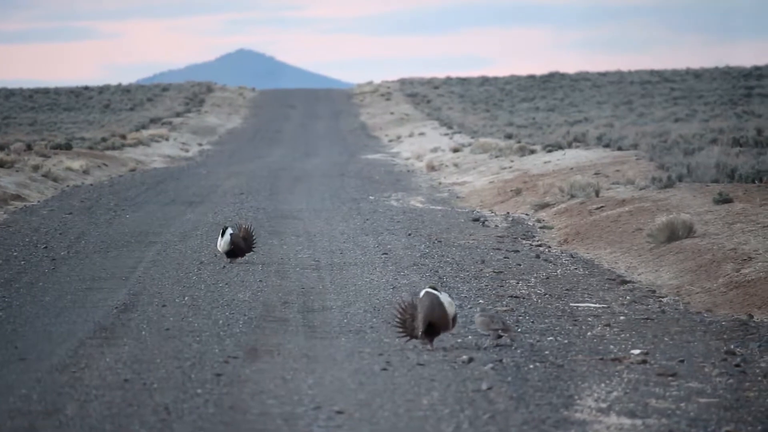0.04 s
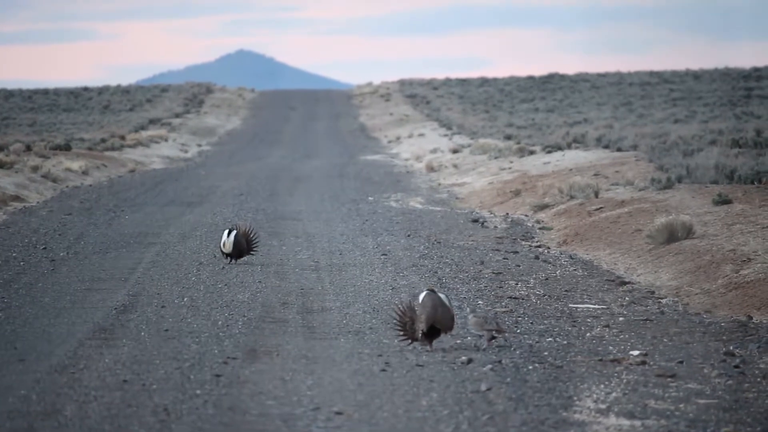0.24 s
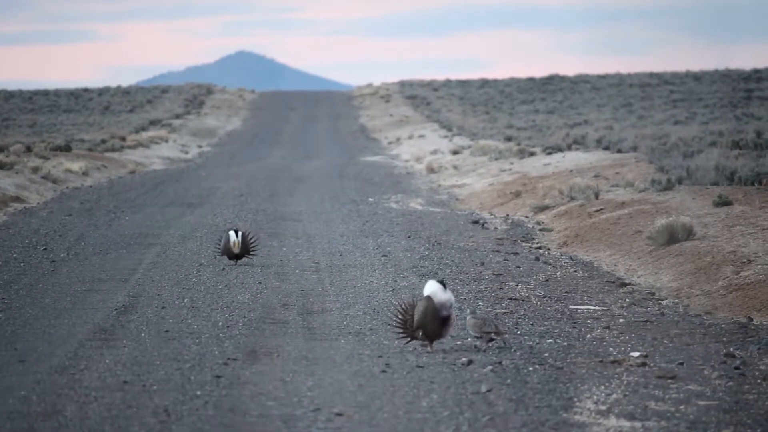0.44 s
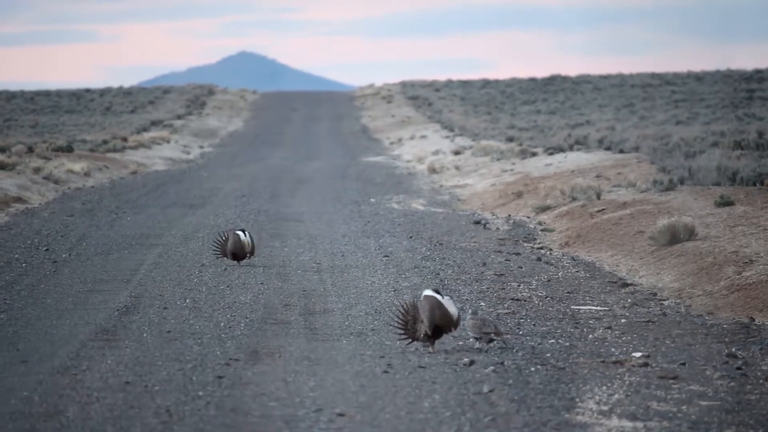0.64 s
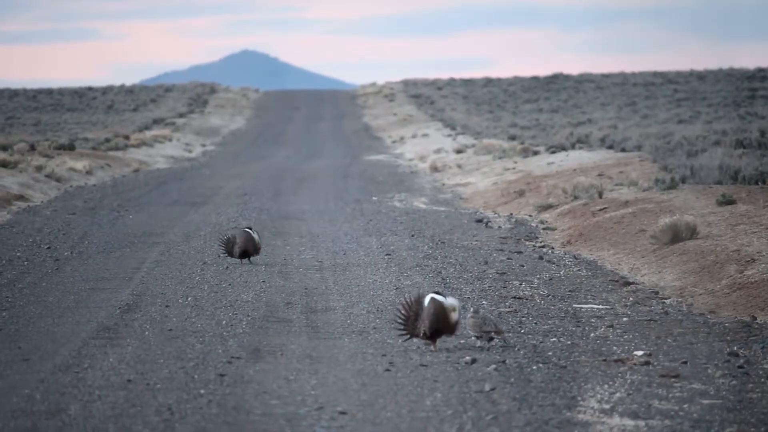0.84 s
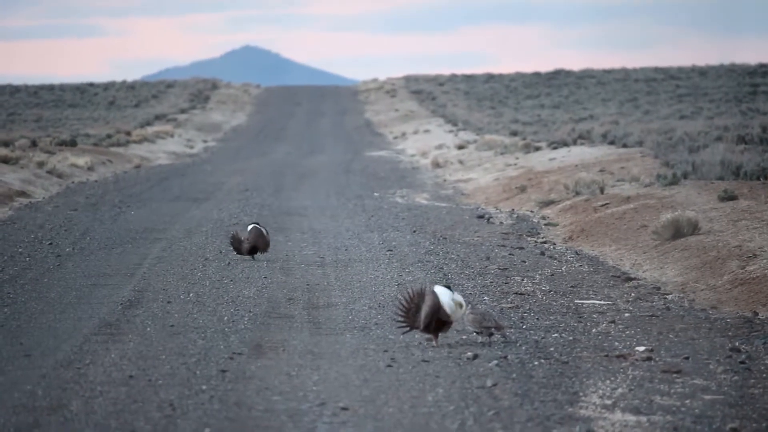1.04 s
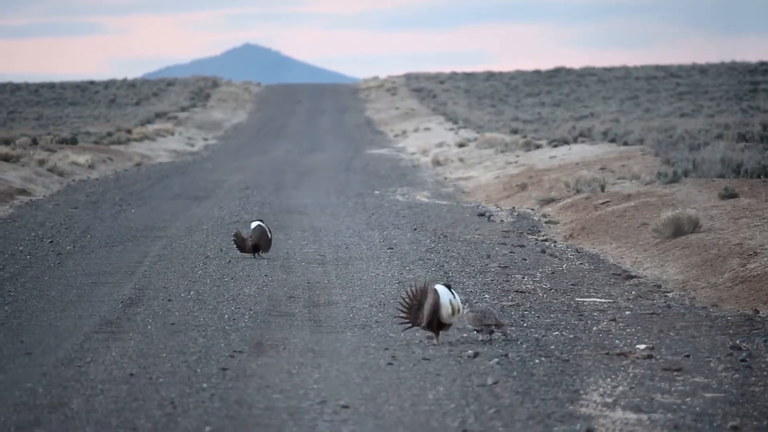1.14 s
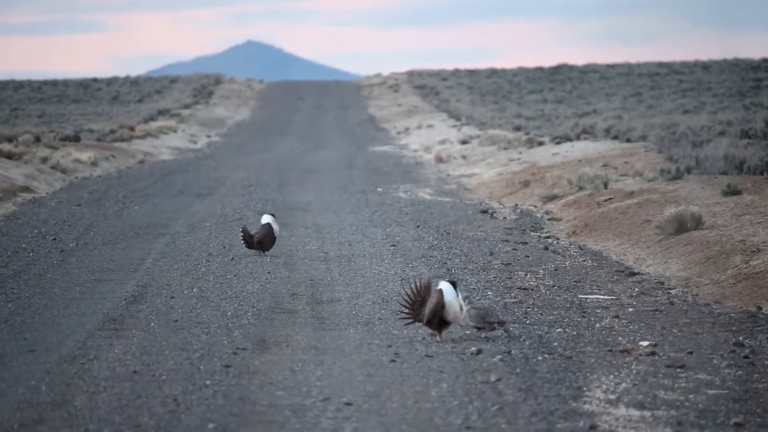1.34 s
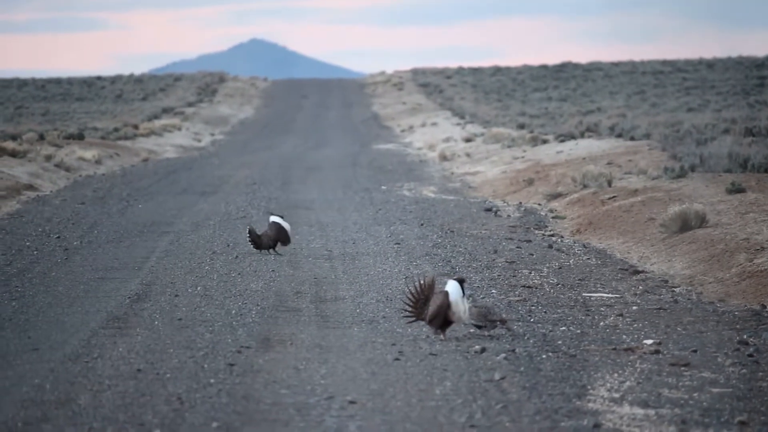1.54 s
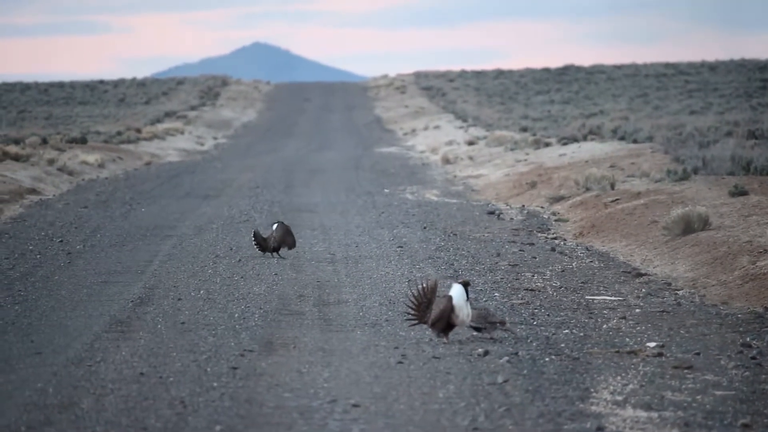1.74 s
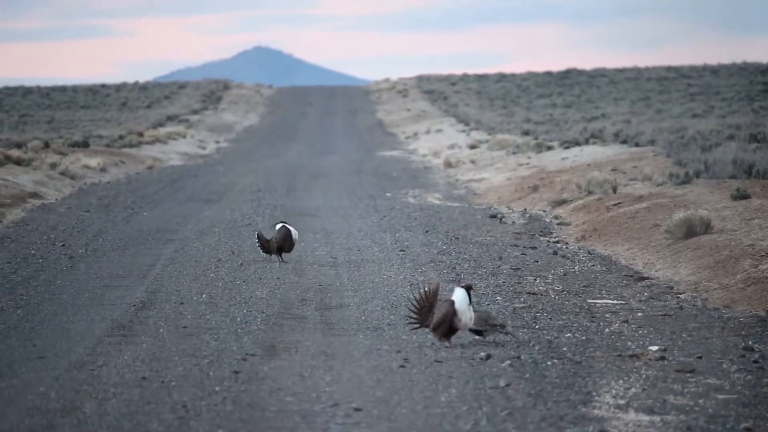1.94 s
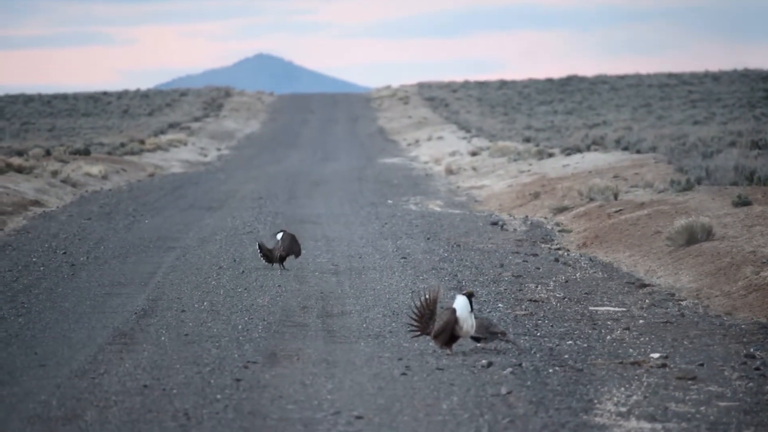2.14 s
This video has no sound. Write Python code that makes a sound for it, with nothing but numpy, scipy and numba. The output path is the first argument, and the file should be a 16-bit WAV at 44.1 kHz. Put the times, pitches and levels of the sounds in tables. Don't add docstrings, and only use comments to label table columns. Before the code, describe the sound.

Wind thumps and rumbles hard against a small stereo microphone for the first second, then eases to lighter bumps and hiss; two distant grouse displays pop and whistle faintly on an open gravel road, with tiny far chirps.

```python
import sys
import numpy as np
from scipy import signal
from scipy.fft import rfft, irfft
from scipy.io import wavfile
from scipy.ndimage import uniform_filter1d
from numba import njit

SR = 44100
rng = np.random.default_rng(int(sys.argv[2]) if len(sys.argv) > 2 else 0)


def pcm_store(signal):
    levels = np.round(np.clip(np.atleast_2d(signal), -1, 1) * 32767)
    wavfile.write(sys.argv[1], SR, levels.astype(np.int16).T)


def level_to_linear(level):
    exponent = np.asarray(level, float) / 20
    return 10 ** exponent


N = 97020
T = np.arange(N) / SR

# start_s, length_s, level_db
LEFT_GUSTS = [(.01, .06, -34), (.09, 0.084, -27), (.195, 0.064, -43), (.29, 0.16, -20.5), (.348, 0.1, -7),
              (.415, 0.09, -18.5), (.54, 0.045, -6.5), (.6, 0.13, -18), (.72, 0.07, -26), (.8, 0.058, -15),
              (.96, 0.073, -13), (1.05, 0.081, -26.5), (1.14, 0.015, -15), (1.19, 0.057, -24.5),
              (1.286, 0.037, -19), (1.32, 0.053, -24), (1.37, 0.051, -32.5), (1.49, 0.026, -20.5),
              (1.69, 0.047, -27.5), (1.76, 0.029, -25.5), (1.87, 0.06, -33.5), (1.93, 0.054, -29),
              (2.04, 0.023, -26.5)]
RIGHT_GUSTS = [(0, 0.069, -28), (.09, 0.085, -25), (.2, 0.33, -23), (.335, 0.11, -10.5), (.41, 0.078, -4),
               (.5, 0.03, -15.5), (.54, 0.042, -11.5), (.61, 0.077, -8), (.7, 0.075, -14.5),
               (.79, 0.061, -11), (.875, 0.03, -11), (.94, 0.11, -8), (1.08, 0.025, -26.5),
               (1.145, 0.033, -23), (1.2, 0.046, -28.5), (1.27, 0.13, -31), (1.38, 0.12, -33),
               (1.48, 0.069, -21), (1.58, 0.044, -37), (1.7, 0.14, -39), (1.9, 0.027, -56),
               (2.08, 0.14, -37)]
GUST_ATTACK_S, GUST_RELEASE_S, LULL_DB = 0.0093, 0.023, -43

EDDIES_PER_S, EDDY_MS, EDDY_SPREAD = 91, 3.62, 0.38
EDDY_DB, EDDY_SCATTER_DB = -4.5, 4.5
EDDY_WIDEN_PER_DB = 0.086
SUCTION_SHARE, EDDY_RIM, EDDY_RIM_WIDTHS = 0.63, 0.51, 5.8

# time_s, depth_db, width_ms
LEFT_BUFFETS = [(0.2103, -7.5, 2.9), (0.2256, -12.5, 3.5), (0.3474, 4, 1.85), (0.3583, 1.5, 1.27),
                (0.3798, 0, 1.8), (0.3935, 1.5, 1.27), (0.4087, 1.5, 1.03), (0.4295, -15, 3.4),
                (0.5487, 0.5, 2.31), (0.5789, -4.5, 1.66), (0.7244, -15, 2.3), (0.7501, -11.5, 1.58),
                (0.8094, -12.5, 1.97), (0.8282, -8.5, 2.7), (0.8444, -16, 2.5), (0.9861, -9.5, 1.37),
                (1.004, -12, 1.43), (1.0166, -10, 1.46), (1.0261, -4.5, 1.7), (1.117, -16, 2.15),
                (1.1478, -13, 2.18), (1.291, .5, 3.5), (1.3005, -6, 3.03), (1.338, -15.5, 2.87),
                (1.5216, -16, 4.4), (1.7166, -19, 2.34), (1.7933, -21.5, 4.5), (1.885, -15, 4.8),
                (1.9391, -16.5, 3.56), (1.9703, -13, 3.5), (2.0807, -22.5, 3.7)]
RIGHT_BUFFETS = [(0.106, -15.5, 3), (0.2475, -21.5, 5.5), (0.3374, -9, 6), (0.4082, -2, 4.2),
                 (0.4174, 9, 3), (0.4377, 1, 1), (0.4577, 7, 1.85), (0.479, -3.5, 2.03),
                 (0.5478, -2.5, 3.1), (0.5623, 0.5, 1.32), (0.5673, -2, 3.7), (0.5881, -1.5, 2.5),
                 (0.6307, 5.5, 2.46), (0.6492, -6.5, 1.58), (0.675, -9, 3.4), (.705, -10.5, 2.8),
                 (.7241, -4.5, 3), (0.7452, -8.5, 2.2), (0.8005, -15.5, 1.76), (0.8216, -8.5, 1.7),
                 (0.8483, -5.5, 2.2), (0.8945, -2, 1.9), (0.9413, -7, 4.5), (0.9614, -1.5, 2.83),
                 (0.9853, -.5, 3.04), (1.0132, 0, 1.81), (1.0534, -8, 1.57), (1.1648, -8.5, 2.83),
                 (1.3414, -15, 3.7), (1.4869, -11.5, 2.23), (1.5032, -8.5, 3.1), (1.512, -12.5, 3)]
BUFFET_SHAPE, BUFFET_TOP_HZ, BUFFET_RIM, BUFFET_RIM_WIDTHS = 0.74, 513, 0.27, 3.5
REBOUND_WIDTHS, REBOUND_DB = 3.584, -8
SWEPT_MS, SWEPT_DB = 3.5, -4.5

ROLL_DB, ROLL_HZ, ROLL_WIDTH, ROLL_TOP_HZ = -7.5, 90.8, 1.11, 309
ROLL_RISE_PER_DB, ROLL_WANDER = 0.0258, 0.13
SWAY_DB, SWAY_HZ, SWAY_FLICKER_DB = -35.5, 63, 2.5
WIND_LOW_CUT_HZ = 52

# frequency_hz, density_db per Hz
HISS_SPECTRUM = [(150, -9.5), (400, -1), (800, -1.5), (1100, -5), (2500, -9), (5000, -12), (9000, -17.5),
                 (15300, -25)]
HISS_DB, HISS_FLICKER_DB, HISS_PAN_DB = -56, 1.1, -1.1

# start_s, length_s, from_hz, to_hz, level_db, pan_db
COOS = [
    (.284, 0.069, 488, 364, -49, -2.0),
    (.924, 0.049, 499, 532, -46, -6),
]

# time_s, depth_db, width_ms
PORT_FLICKS = [
    [(.3465, -15.5, 1), (.377, -18, 0.87), (.551, -22.5, 0.67)],
    [(.4145, -5.5, 0.62), (.435, -12, 0.75), (.46, -6, 0.67), (.584, -17, 0.33), (.627, -10, 0.96)],
]
FLICK_TOP_HZ = 1160

# time_s, level_db, ring_hz, t60_s
POPS = [(.4418, -37, 1830, 0.014), (.445, -45, 2700, 0.0077), (.4468, -41, 2010, 0.0058),
        (.443, -52, 3030, .006), (.4485, -58, 2940, .005), (1.0893, -40.5, 493, 0.013),
        (1.0915, -32.5, 500, 0.013), (1.0915, -41.5, 1000, 0.026), (1.0893, -43.5, 2230, 0.0093),
        (1.0915, -41.5, 1360, 0.0096), (1.0915, -49, 2000, 0.0068), (1.0917, -47, 3100, 0.0063),
        (1.3, -53, 3950, .004), (1.0905, -55, 2300, 0.0039)]
POP_PAN_DB = -2.5

# time_s, pitch_hz, level_db
WHISTLES = [
    [(.444, 1018, -51.5), (.474, 1388, -56), (.482, 1550, -53), (.495, 2070, -64), (.502, 2535, -67),
     (.51, 2710, -65), (.514, 2490, -62), (.523, 1620, -61.5), (.533, 1050, -65.5)],
    [(1.092, 956, -59), (1.118, 1202, -62), (1.13, 1482, -58), (1.14, 1942, -73), (1.148, 2380, -60),
     (1.158, 2750, -61), (1.163, 2570, -54.5), (1.17, 1770, -62), (1.183, 1030, -66)],
]
WHISTLE_PAN_DB = -2

# time_s, pitch_hz, level_db
RASP_CALL = [
    (.55, 4100, -70),
    (.558, 3945, -60.5),
    (.572, 3210, -76),
    (.584, 2850, -61),
    (.598, 3110, -63.5),
    (.61, 3480, -66),
    (.622, 4100, -71),
    (.628, 4300, -74),
]
RASP_PAN_DB = -6

# start_s, length_s, from_hz, to_hz, level_db, pan_db
RASPS = [
    (.562, .03, 3516, 3420, -61, -1),
    (.612, 0.0195, 3520, 3330, -67, 0),
]
RASP_HZ, RASP_DEPTH = 330, 0.75

# start_s, length_s, from_hz, to_hz, level_db, pan_db
CHIRPS = [
    (.91, .02, 2890, 2810, -69, -4),
    (1.03, 0.02, 2560, 2550, -64, -6),
]

# start_s, length_s, from_hz, to_hz, level_db, pan_db
FLUTTERS = [
    (1.284, 0.018, 415, 398, -37, 13.5),
    (1.158, 0.0145, 480, 430, -49, -9),
]

# time_s, pitch_hz, level_db
HELD_NOTE = [
    (1.638, 2204, -72),
    (1.649, 2347, -61.5),
    (1.667, 2210, -63),
    (1.68, 2250, -70),
    (1.693, 2299, -71),
    (1.7, 2295, -76),
]
HELD_PAN_DB = -7.5

WAVER, WAVER_DB = 0.007, 1.2
ECHO_S, ECHO_DB = 0.008, -14
WIDEN, WIDEN_HZ, WIDEN_SLOPE = 0.44, 2600, 1.3
DUCK_ATTACK_S, DUCK_RELEASE_S, DUCK_ABOVE_DB, DUCK_RATIO = 0.03, 0.05, -16.5, 3.0
TOP_HZ, CEILING = 15400, 0.96


def walk(rate):
    hold = int(SR / rate)
    steps = np.repeat(rng.standard_normal(N // hold + 1), hold)
    return 1.33 * uniform_filter1d(uniform_filter1d(steps, hold), hold)[:N]


def shaped(x, gain):
    return irfft(rfft(x) * gain(np.fft.rfftfreq(N, 1 / SR) + 1), N)


def low_passed(x, top_hz, slope):
    return shaped(x, lambda f: 1 / (1 + (f / top_hz) ** slope))


def panned(x, pan_db):
    return x * level_to_linear(np.array([[pan_db], [-pan_db]]) / 2)


@njit
def bumps(length, at, width, size, rim, wide):
    y = np.zeros(length)
    for k in range(len(at)):
        first = max(int(at[k] - 12 * width[k]), 0)
        last = min(int(at[k] + 12 * width[k]), length)
        for i in range(first, last):
            u = (i - at[k]) / width[k]
            y[i] += size[k] * (1 / (1 + u * u) ** 2 - rim * np.exp(-(u / wide) ** 2))
    return y


def gust_force(gusts, buffets):
    force = level_to_linear(LULL_DB)
    for start, length, db in gusts:
        corners = [start - GUST_ATTACK_S, start, start + length, start + length + GUST_RELEASE_S]
        force = force + level_to_linear(db) * np.interp(T, corners, [0, 1, 1, 0]) ** 2
    swept = np.max([np.exp(-((T - row[0]) * 1000 / SWEPT_MS) ** 2) for row in buffets], axis=0)
    return force * level_to_linear(SWEPT_DB * swept)


def eddies(force):
    gap, spread, scatter, sign = np.clip(rng.standard_normal((900, 4)).T, -1.5, 1.7)
    at = np.minimum(np.cumsum(np.exp(0.4 * gap)) * SR / EDDIES_PER_S, N + 9999)
    here = force[np.minimum(at.astype(int), N - 1)]
    force_db = 20 * np.log10(here) + 20
    ms = EDDY_MS * np.exp(EDDY_SPREAD * spread + EDDY_WIDEN_PER_DB * force_db)
    push_or_suck = np.tanh(4 * (sign - SUCTION_SHARE + 0.5))
    size = here * level_to_linear(EDDY_DB + EDDY_SCATTER_DB * scatter) * push_or_suck
    return bumps(N, at, ms * SR / 1000, size, EDDY_RIM, EDDY_RIM_WIDTHS)


def hard_buffets(buffets):
    s, db, ms = np.array(buffets).T
    width = BUFFET_SHAPE * ms * SR / 1000
    at = np.r_[s * SR, s * SR + REBOUND_WIDTHS * width]
    depth = level_to_linear(np.r_[db, db + REBOUND_DB])
    hits = bumps(N, at, np.r_[width, width], -depth, BUFFET_RIM, BUFFET_RIM_WIDTHS)
    return low_passed(hits, BUFFET_TOP_HZ, 3)


@njit
def svf(x, hz, k):
    y, b, l = np.empty(len(x)), 0., 0.
    for i in range(len(x)):
        g = np.tan(np.pi * hz[i] / SR)
        v = (b + g * (x[i] - l)) / (1 + g * (g + k))
        b, l, y[i] = 2 * v - b, l + 2 * g * v, k * v
    return y


def roll(force):
    force_db = 20 * np.log10(force) + 20
    hz = ROLL_HZ * np.exp(ROLL_RISE_PER_DB * force_db + ROLL_WANDER * walk(24.95))
    x = rng.standard_normal(N) / np.sqrt(hz)
    for _ in range(2):
        x = svf(x, hz, ROLL_WIDTH)
    x = low_passed(x, ROLL_TOP_HZ, 4)
    return level_to_linear(ROLL_DB) * uniform_filter1d(force, size=300) * x / x.std()


def sway():
    x = low_passed(rng.standard_normal(N), SWAY_HZ, 3)
    return level_to_linear(SWAY_DB + SWAY_FLICKER_DB * walk(15)) * x / x.std()


def wind(gusts, buffets):
    force = gust_force(gusts, buffets)
    pressure = eddies(force) + hard_buffets(buffets) + roll(force) + sway()
    return signal.sosfilt(signal.butter(2, WIND_LOW_CUT_HZ, "high", fs=SR, output="sos"), pressure)


def hiss():
    hz, db = np.array(HISS_SPECTRUM).T
    x = shaped(rng.standard_normal(N), lambda f: level_to_linear(np.interp(np.log(f), np.log(hz), db)))
    return x / x.std() * level_to_linear(HISS_DB + HISS_FLICKER_DB * walk(12.64))


def tone(hz, gain):
    phase = 2 * np.pi * np.cumsum(hz * (1 + WAVER * walk(90))) / SR
    return np.sqrt(2) * gain * level_to_linear(WAVER_DB * walk(150)) * np.sin(phase)


def notes(rows):
    out = 0
    for start, length, from_hz, to_hz, db, pan_db in rows:
        u = np.clip((T - start) / length, 0, 1)
        swell = np.sin(np.pi * u ** 0.89) ** 0.62
        out = out + panned(tone(from_hz + (to_hz - from_hz) * u, level_to_linear(db) * swell), pan_db)
    return out


def flicks(rows):
    s, db, ms = np.array(rows).T
    ticks = bumps(N, s * SR, ms * SR / 1000, -level_to_linear(db), BUFFET_RIM, BUFFET_RIM_WIDTHS)
    return low_passed(ticks, FLICK_TOP_HZ, 4)


def pops():
    out = 0
    for start, db, ring_hz, t60 in POPS:
        u = np.maximum(T - start, 0)
        out = out + panned(level_to_linear(db - 60 * u / t60) * np.sin(2 * np.pi * ring_hz * u), POP_PAN_DB)
    return out


def glide(curve, pan_db):
    s, hz, db = np.array(curve).T
    gain = uniform_filter1d(level_to_linear(np.interp(T, s, db, left=-140, right=-140)), size=100)
    pitch = uniform_filter1d(np.interp(T, s, hz), size=200)
    return panned(tone(pitch, gain), pan_db)


def grouse():
    return notes(COOS) + pops() + sum(glide(curve, WHISTLE_PAN_DB) for curve in WHISTLES)


def far_birds():
    throb = (1 + RASP_DEPTH * walk(2 * RASP_HZ)) / 1.48
    raspy = (glide(RASP_CALL, RASP_PAN_DB) + notes(RASPS)) * throb
    return raspy + notes(CHIRPS) + glide(HELD_NOTE, HELD_PAN_DB)


def scene():
    left = wind(LEFT_GUSTS, LEFT_BUFFETS) + flicks(PORT_FLICKS[0]) + hiss()
    right = wind(RIGHT_GUSTS, RIGHT_BUFFETS) + flicks(PORT_FLICKS[1]) + hiss() * level_to_linear(-HISS_PAN_DB)
    ports = np.array([left, right])
    crossed = WIDEN * low_passed(ports[::-1], WIDEN_HZ, WIDEN_SLOPE)
    birds = grouse() + far_birds()
    echo = level_to_linear(ECHO_DB) * np.roll(birds, int(ECHO_S * SR), axis=1)
    return ports - crossed + notes(FLUTTERS) + birds + echo


@njit
def follow(x, attack, release):
    y, e = np.empty(len(x)), 0.
    for i in range(len(x)):
        e += (x[i] - e) * (attack if x[i] > e else release)
        y[i] = e
    return y


def top_cut(x):
    return signal.sosfilt(signal.butter(12, 15420, fs=SR, output="sos"), x)


def record(dry):
    loudness = follow(np.abs(dry).max(axis=0), 1 / (DUCK_ATTACK_S * SR), 1 / (DUCK_RELEASE_S * SR))
    over = np.minimum(level_to_linear(DUCK_ABOVE_DB) / (loudness + 1e-9), 1)
    ducked = dry * over ** (1 - 1 / DUCK_RATIO)
    rounded = ducked / (1 + (ducked / CEILING) ** 4) ** 0.25
    mix = shaped(rounded, lambda f: f < TOP_HZ)
    return top_cut(mix)


dry = scene()
out = record(dry)
pcm_store(out)
```